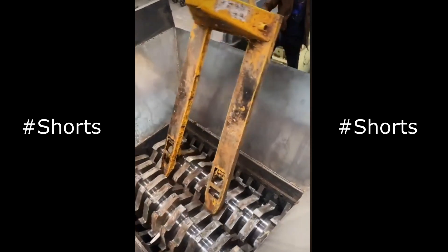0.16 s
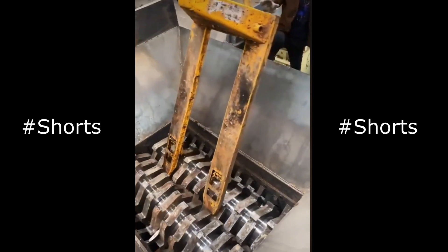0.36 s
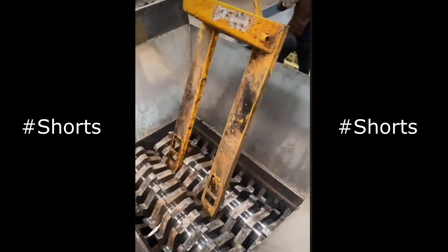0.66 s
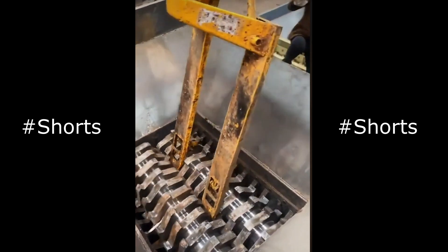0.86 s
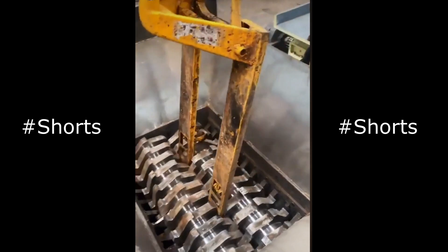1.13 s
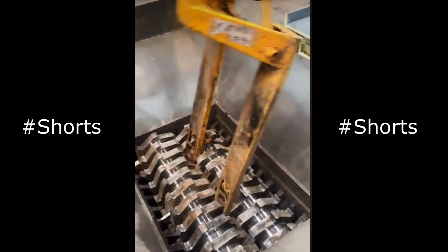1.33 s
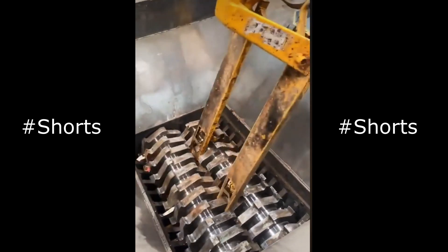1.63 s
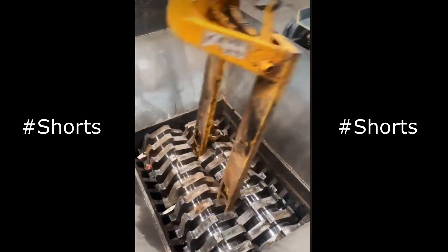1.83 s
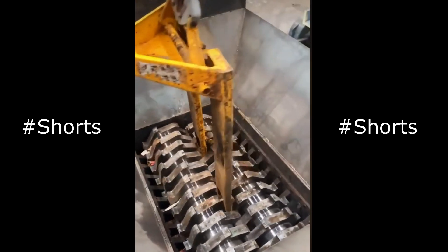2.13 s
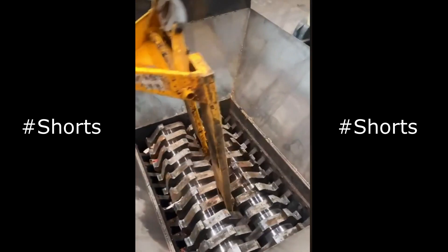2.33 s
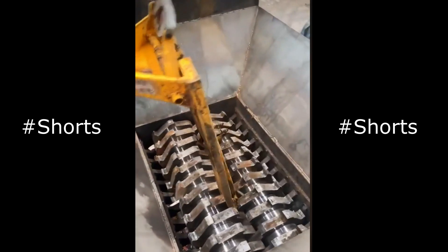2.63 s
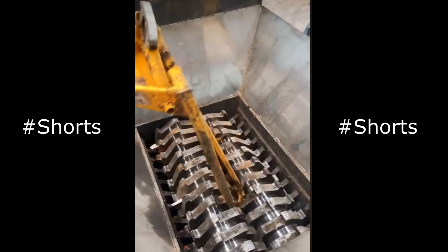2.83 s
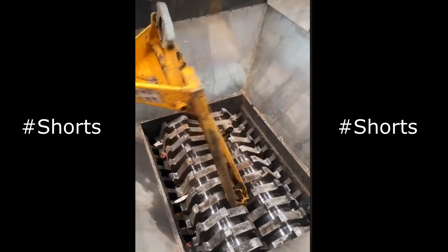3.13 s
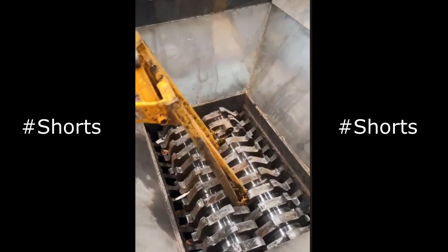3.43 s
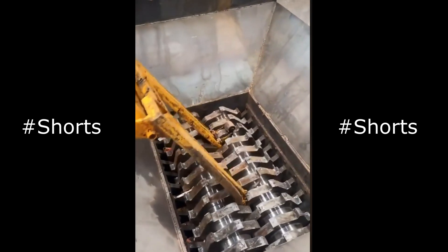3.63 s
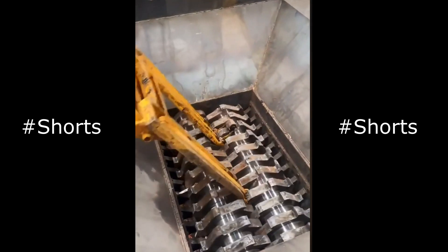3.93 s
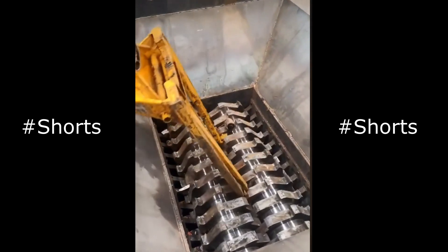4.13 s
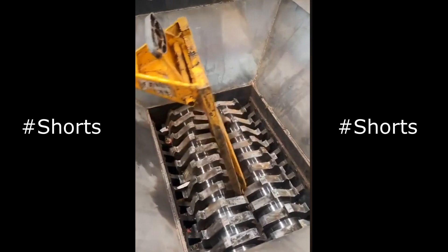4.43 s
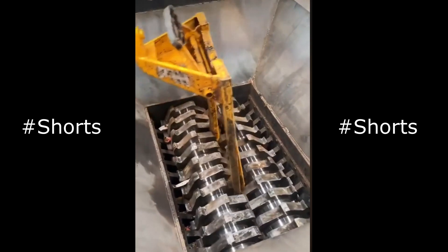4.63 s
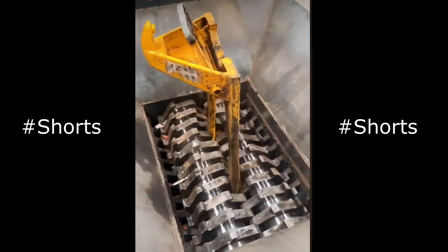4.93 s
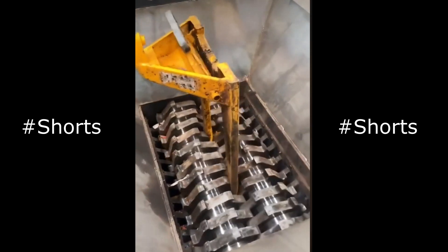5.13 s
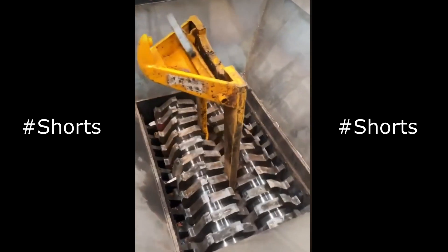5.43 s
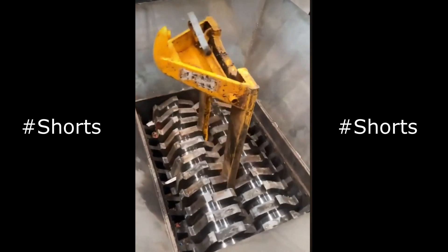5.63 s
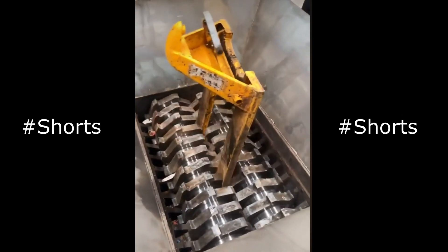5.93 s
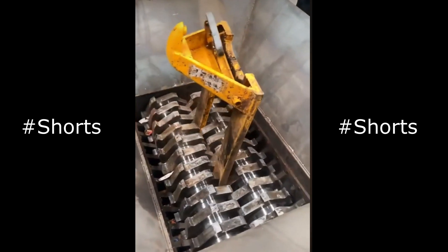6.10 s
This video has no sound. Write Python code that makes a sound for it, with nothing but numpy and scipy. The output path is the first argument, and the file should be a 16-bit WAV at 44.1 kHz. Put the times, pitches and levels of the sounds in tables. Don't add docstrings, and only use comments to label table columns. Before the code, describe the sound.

Close above a steel hopper, a twin-shaft shredder chews the forks of a pallet jack. Dense crunching and scraping over a low drive rumble dips abruptly, then hard clanks and snaps come in uneven bursts between quieter stretches. After another brief dip, a heavy bite roars low, cracks sharply and breaks into a shrill multi-toned squeal, followed by weaker grinding and ticks. Phone microphone, stereo, slightly saturated.

```python
import sys
import numpy as np
from scipy import signal
from scipy.fft import rfft, irfft, next_fast_len
from scipy.io import wavfile
from scipy.ndimage import uniform_filter1d

SR = 44100
rng = np.random.default_rng(int(sys.argv[2]) if len(sys.argv) > 2 else 0)


def how_loud(loudness_db):
    steps = np.asarray(loudness_db, float) / 20
    return 10 ** steps


def wav_record(signal):
    frames = np.transpose(np.atleast_2d(signal))
    bounded = np.clip(frames, -1, 1)
    quanta = np.round(bounded * 32767).astype(np.int16)
    wavfile.write(sys.argv[1], SR, quanta)


N = 276242
TIME = np.arange(N) / SR


def level(x, db):
    return x * how_loud(db) / np.sqrt(np.mean(x ** 2))


def colour(x, points):
    hz, db = np.transpose(points)
    size = next_fast_len(len(x))
    f = np.maximum(np.fft.rfftfreq(size, 1 / SR), 1)
    gain = how_loud(np.interp(np.log(f), np.log(hz), db))
    return irfft(rfft(x, size) * gain, size)[:len(x)]


def walk(rate, size=N):
    k = int(SR / rate)
    held = np.repeat(rng.standard_normal(size // k + 1), k)
    return 1.03 * uniform_filter1d(uniform_filter1d(held, k), k)[:size]


def mode(x, hz, t60):
    pole = np.exp(2j * np.pi * hz / SR - np.log(1000) / (t60 * SR))
    return signal.lfilter([1], [1, -pole], x).imag


def strokes(t, s, hold, db, rise, fall):
    power = 0
    for start, held, peak_db, fade in np.broadcast(s, hold, db, fall):
        swelling_db = abs(rise) * np.maximum(start - t, 0)
        fading_db = abs(fade) * np.maximum(t - start - held, 0)
        power = power + how_loud(2 * (peak_db - swelling_db - fading_db))
    return np.sqrt(power)


def grains(per_s, spread_db, smear_s):
    size = (rng.random(N) < per_s / SR) * how_loud(spread_db * rng.exponential(size=N))
    puffs = signal.lfilter([1], [1, -np.exp(-1 / (smear_s * SR))], size)
    return (puffs + 3.6 * np.mean(puffs)) * rng.standard_normal(N)


def steel(x, lo_hz, hi_hz, t60, share, count):
    t, rings = TIME[:SR // 8], 0
    for _ in range(2):
        hz = lo_hz * (hi_hz / lo_hz) ** rng.random(count)
        phase = 2 * np.pi * rng.random(count)
        partials = np.sin(2 * np.pi * hz[:, None] * t + phase[:, None])
        ring = np.sum(partials, axis=0) * 1000 ** (-t / t60)
        rings = rings + signal.oaconvolve(x * np.maximum(walk(7), 0), ring)[:N]
    return level(x, 0) + share * level(rings, 0)


# (time [s], hold [s], level [dB])
BITES = [(0, 0.18, -28.5), (0.154, 0.24, -24.5), (0.396, 0.4, -28.5), (0.878, 0.085, -24), (0.97, 0.1, -36),
         (1.093, 0.1, -35.5), (1.207, 0.085, -28.5), (1.287, 0.095, -33), (1.471, 0.06, -27),
         (1.52, 0.028, -39), (1.605, 0.11, -23.5), (1.765, 0.095, -27), (1.989, 0.04, -47.5),
         (2.203, 0.046, -67), (2.591, 0.033, -22.5), (2.72, 0.033, -24.5), (2.754, 0.28, -35.5),
         (3.619, 0.02, -27.5), (3.712, 0.076, -45.5), (3.997, 0.18, -40.5), (4.2, 0.25, -52),
         (4.459, 0.19, -34.5), (4.614, 0.28, -56), (4.986, 0.035, -37.5), (5.114, 0.24, -17),
         (5.424, 0.11, -43), (5.54, 0.14, -46), (5.654, 0.24, -37.5), (5.89, 0.076, -38.5),
         (5.97, 0.24, -37), (6.115, 0.16, -38), (6.112, 0.071, -41)]
# (time [s], hold [s], grinding level [dB], hiss above the grinding [dB])
SLIDE = [(0, 0.074, -27.5, -11), (0.137, 0.2, -32, -15), (0.287, 0.36, -41, -14), (0.494, 0.078, -35, -3),
         (0.662, 0.035, -37.5, -1), (0.868, 0.18, -32.5, -8), (0.897, 0.066, -24, -1.5),
         (1.104, 0.018, -39, 8), (1.489, 0.067, -44, -0.5), (1.618, 0.089, -43, 2.5),
         (1.784, 0.054, -36.5, 0.5), (1.913, 0.27, -61, -2.5), (2.403, 0.13, -60, -4.5),
         (4.287, 0.18, -66, 0.5), (4.652, 0.21, -62, -11), (2.214, 0.033, -44.5, -5.5),
         (2.283, 0.081, -53.5, -7), (2.566, 0.054, -37.5, -5.5), (2.74, 0.0076, -25, -20.5),
         (2.759, 0.25, -35, -29), (3.497, .11, -55.5, -3), (3.61, 0.072, -46, -1), (3.71, 0.3, -55, -3),
         (4.057, 0.14, -55, -5.5), (4.234, 0.055, -58, 1), (4.465, 0.056, -37.5, -22),
         (4.524, 0.11, -46, -9), (4.924, 0.13, -50.5, -0.5), (5.123, 0.3, -32.5, -19.5),
         (5.411, 0.12, -20, -2.5), (5.52, 0.24, -36, 7), (5.735, 0.077, -13.5, 1),
         (5.902, 0.19, -48.5, -2.5), (6.15, 0.045, -45.5, -11), (6.228, 0.013, -31, -39)]
# (frequency [Hz], level [dB])
CRUSH = [(110, -38), (200, 0.5), (400, -1.5), (600, -4), (800, -12), (1500, -21), (2600, -39), (6000, -96)]
GRIND = [(500, -25), (900, -5), (1400, 0), (2600, -7), (4000, -11), (5500, -15), (7000, -32), (9000, -70)]
HISS = [(3500, -36), (5500, -4), (7500, 2), (10000, -3.5), (13000, 2.5), (15800, -9), (16000, -70)]


def teeth():
    crushing = steel(grains(460, 0.88, 0.0026), 121.0, 936, 0.07, 0.15, count=10)
    tearing = grains(1500, 2.8, .002)
    crush = colour(crushing, CRUSH)
    grind = colour(steel(tearing, 700, 6000, .08, .25, count=30), GRIND) * how_loud(1.2 * walk(18))
    hiss = colour(steel(tearing, 5000, 15500, .15, 1.1, count=40), HISS) * how_loud(1.2 * walk(18))

    slow = TIME[::64]
    s, hold, grind_db, hiss_db = np.transpose(SLIDE)
    rise, fall = 430, 334
    crush_move = strokes(slow, *np.transpose(BITES), 1500, 495)
    grind_move = strokes(slow, s, hold, grind_db, rise, fall)
    hiss_move = strokes(slow, s, hold, grind_db + hiss_db, rise, fall)

    squeal_dip_db = np.interp(TIME, (5.39, 5.43, 5.86, 5.92), (0, -12, -12, 0))
    first_change_s, idle_wander_db = 1.42, 2.5
    out = 0
    for x, move, early_idle_db, late_idle_db, thinning in (
            (crush, crush_move, -31, -54, 0),
            (grind, grind_move, -43, -70, 1),
            (hiss, hiss_move, -57, -89, 1.4)):
        idle = how_loud(np.where(TIME < first_change_s, early_idle_db, late_idle_db + idle_wander_db * walk(4)))
        gain = np.hypot(np.interp(TIME, slow, move), idle)
        out = out + level(x, 0) * gain * how_loud(thinning * squeal_dip_db)
    return out


# (frequency [Hz], level [dB])
BODY = [(120, -31), (250, -11), (600, -0.5), (1500, -8), (2800, -7), (4000, -11.5), (6000, -38.5)]


def strike(table, thud_db, contact_s):
    out, t = np.zeros(N + SR), TIME[:SR // 7] - .008
    after = np.maximum(t, 0) / max(contact_s, .001)
    bite = after ** 2 * np.exp(2 - 2 * after)
    rattle = 0.13 * (1 - np.exp(-after)) * np.exp(-t / 0.02)
    push = bite + rattle
    for s, db, hz, treble_db in table:
        noise, pick = rng.standard_normal((2, len(t))), rng.random((3, 12))
        force = push * noise[0] * (1.2 + np.abs(noise[1]) ** 3.13)
        main = mode(force, hz, 0.028)
        ring = sum(mode(force, 600 * 8.0 ** p, 0.04) for p in np.r_[pick[0], pick[2, 4:]])
        crack = colour(force, GRIND)
        body = colour(force, BODY)
        tinkle = sum(mode(force, 5500 + 9500 * p, .035) for p in pick[1])
        treble = colour(force, HISS) + .02 * tinkle
        thud = sum(mode(force, 130 * 3.7 ** p, 0.053) for p in pick[2, :4])
        parts = ((main, -10), (ring, -11), (crack, -6), (body, -5),
                 (treble, treble_db + 6.5), (thud, thud_db))
        i = int((s - .01) * SR)
        out[i:i + len(t)] += sum(x / np.max(np.abs(x)) * how_loud(db + d) for x, d in parts)
    return out[:N]


# (time [s], peak level [dB], main mode [Hz], treble level [dB])
BLOWS = [(0.855, -23.5, 1375, -10), (1.462, -32, 875, -28.5), (1.512, -15, 1740, -5.5),
         (1.592, -17.5, 850, -19), (1.634, -12, 3640, -11), (1.704, -24, 605, -10),
         (1.773, -11.5, 1930, -19), (1.842, -17.5, 500, -24), (2.212, -42.5, 1900, -8),
         (2.279, -33.5, 1140, -31), (2.588, -9, 1860, -9.5), (2.716, -12, 2000, -17),
         (2.991, -14, 1920, -14.5), (4.988, -19, 1980, -37.5), (5.974, -29.5, 1250, -26)]


def frame_blows():
    return strike(BLOWS, thud_db=-9.5, contact_s=0.004)


# (time [s], peak level [dB], main mode [Hz], treble level [dB])
CRACKS = [(0.038, -16.5, 850, -10), (0.195, -13.5, 1230, -15), (0.277, -7.5, 810, -12.5),
          (1.611, -16, 650, -10.5), (2.549, -31, 1590, -11), (2.945, -8, 1510, -29), (2.987, -7, 2700, -16),
          (3.615, -14, 1530, -18.5), (4.455, -16, 1790, -18), (4.587, -21, 1560, -14.5),
          (5.367, -5.5, 3320, -51), (6.172, -22, 2900, -36.5), (6.204, -32.5, 1150, -52.5)]


def tooth_cracks():
    return strike(CRACKS, thud_db=-18, contact_s=0.0035)


# (time [s], peak level [dB], main mode [Hz], treble level [dB])
SNAPS = [(.149, -11, 3430, -10.5), (.153, -13.5, 1475, -9.5), (.194, -3.5, 1540, -17),
         (.274, -11, 2900, -18.5), (.28, -6, 1286, -26), (.489, -23.5, 1140, -10.5),
         (.855, -19, 1400, -7.5), (.902, -20.5, 2010, -10.5), (.936, -10, 990, -18),
         (1.087, -18.5, 2830, -4.5), (1.121, -24, 3950, -8.5), (1.514, -3.5, 1800, -18),
         (1.516, -13, 2700, -18.5), (1.607, -9.5, 660, -18.5), (1.675, -17.5, 494, -19.5),
         (2.59, -0.5, 2800, -22.5), (2.714, -8, 3520, -11.5), (2.944, -1.5, 710, -30.5),
         (2.947, -8, 810, -31.5), (3.614, -5.5, 1675, -31.5), (4.034, -33.5, 950, -27),
         (4.099, -34, 1114, -22.5), (4.464, -14.5, 2095, -21), (4.532, -28, 1880, -23),
         (4.591, -20, 1990, -19), (5.11, -22, 405, -39.5)]


def edge_snaps():
    return strike(SNAPS, thud_db=-32.5, contact_s=.0014)


def rub(rubbed_things):
    out = np.zeros(N)
    for peaks, rows in rubbed_things:
        s, hold, db, fade = np.transpose(rows)
        part = slice(int((s[0] - .05) * SR), int((s[-1] + .5) * SR))
        t = TIME[part]
        pressure = strokes(t, s, hold, db, 1400, fade)
        for hz, width, peak_db in peaks:
            rough, t60 = min(width / 80, 1), 2.2 / width
            wavering_hz = hz + 0.23 * width * walk(33, size=len(t))
            tone = np.sin(2 * np.pi * np.cumsum(wavering_hz) / SR + hz)
            noise = mode(rng.standard_normal(len(t)), hz, t60)
            noise = noise * np.sqrt(2 * np.log(1000) / (t60 * SR))
            grip = pressure * how_loud(peak_db + 2.2 * walk(14, size=len(t)))
            out[part] += np.sqrt(2) * grip * (np.sqrt(1 - rough ** 2) * tone + rough * noise)
    return out


# (frequency [Hz], width [Hz], level [dB])
BEAM_ROOT = [(1136, 12, 0)]
WEB = [(1594, 12, 0)]
RIB = [(1782, 14, 0)]
LIP = [(2538, 22, 0)]
HEEL = [(3400, 30, 0)]
SEAM = [(2050, 320, 0)]
# (time [s], hold [s], pressure [dB], fade [dB/s])
SINGING = [
    (BEAM_ROOT, [(5.405, .03, -22.5, 250), (5.495, 0.028, -26.5, 150), (5.57, 0.11, -37.5, 149), (5.67, .03, -29.5, 150), (5.7, .1, -27.5, 400), (5.97, 0.012, -43, 400), (6.19, 0.026, -37.5, 300), (6.215, .05, -36.5, 300)]),
    (WEB, [(5.4, .02, -36, 200), (5.425, .055, -32.5, 150), (5.515, 0.14, -37, 100), (5.7, 0.116, -40, 200), (6.2, .06, -39.5, 300)]),
    (RIB, [(5.39, 0.066, -36, 300), (5.51, .04, -29, 400), (5.635, 0.062, -31.5, 300), (5.795, 0.045, -32, 350), (6.19, 0.082, -44, 300)]),
    (LIP, [(5.39, 0.03, -26.5, 250), (5.5, .2, -45, 200), (5.73, .03, -34.5, 200), (5.765, .035, -33, 700), (6.2, 0.051, -39.5, 300)]),
    (HEEL, [(5.39, 0.031, -24.5, 600), (5.465, 0.061, -28.5, 498), (5.6, .05, -46, 200), (5.705, .02, -40, 200), (5.73, 0.067, -26, 700), (6.21, 0.037, -40, 300)]),
    (SEAM, [(5.42, 0.05, -33.5, 200), (5.56, .1, -60, 200), (5.725, 0.12, -33.5, 700), (6.174, .004, -30, 900), (6.21, 0.033, -40, 400)]),
]


def squealing_beam():
    return rub(SINGING)


# (frequency [Hz], width [Hz], level [dB])
TAB = [(2233, 16, 1), (4410, 67, 13.5), (5700, 27, -21.5), (6700, 27, -19.5)]
WHEEL = [(7050, 40, 3), (3530, 29, -9), (5860, 130, -5)]
DISC = [(9474, 12, 0), (10852, 20, -4), (10100, 150, -2), (13600, 26, -7), (14600, 70, -16),
        (15700, 24, -9), (8718, 20, -8)]
CAP = [(9680, 110, 2), (8400, 160, -17.5), (7150, 48, -20.5), (6200, 150, -9.5)]
LEVER = [(3252, 52, 8), (6280, 83, -9), (7300, 50, -10)]
BOLT = [(2900, 16, 2), (6140, 20, -8), (3370, 27, -10), (3800, 19, -9.5)]
EDGE = [(3447, 49, -3), (6546, 120, -9)]
BEAM_LOW = [(1840, 30, -17), (2330, 24, -24), (2692, 30, -19), (2860, 24, -23), (3860, 30, -12),
            (4119, 22, -26), (4355, 22, -16)]
BEAM_HIGH = [(5125, 22, 14), (5230, 40, 8), (5402, 30, 12), (5870, 30, -4), (6352, 22, -7), (6455, 22, -4),
             (6562, 22, -4), (6701, 30, -1), (7137, 22, 0), (7798, 45, -3), (8718, 22, -2), (9174, 22, -9),
             (9360, 22, -8), (9475, 22, -5), (10118, 22, -11)]
FLANGE = [(10974, 22, -7), (11447, 22, -12), (12706, 30, -2), (12984, 30, -9), (13442, 22, -11),
          (13900, 60, -16), (14048, 30, -11), (14279, 30, -10), (14715, 22, -11), (14790, 30, -14),
          (15405, 30, -11), (15650, 40, -20)]
# (time [s], hold [s], pressure [dB], fade [dB/s])
CUTTERS = [
    (TAB, [(2.605, 0.0022, -31, 210)]),
    (WHEEL, [(2.725, 0.027, -32.5, 307), (2.8, 0.13, -52.5, 296), (2.92, 0.08, -45.5, 500)]),
    (DISC, [(2.735, 0.03, -40, 138), (2.8, .22, -53, 304)]),
    (CAP, [(2.99, 0.0087, -31.5, 603)]),
    (LEVER, [(1.53, 0.014, -42, 400), (1.64, 0.028, -49.5, 400), (1.78, 0.0046, -44.5, 500), (1.815, 0.014, -42.5, 500)]),
    (BOLT, [(3.025, 0.052, -60, 119.5)]),
    (DISC + [(3170, 19, 5.1)], [(4.475, 0.049, -49.5, 240)]),
    (EDGE, [(5.368, 0.0043, -9.5, 901)]),
    (BEAM_LOW, [(5.39, 0.05, -21, 168), (5.5, 0.01, -24, 98), (5.56, .12, -31, 100), (5.69, 0.13, -26, 552), (5.97, 0.0057, -49, 253), (6.185, 0.056, -40, 300), (6.235, .03, -29, 304)]),
    (BEAM_HIGH + FLANGE, [(5.395, 0.43, -41, 191), (5.505, 0.027, -38.5, 198), (6.215, 0.05, -56.5, 300)]),
]


def cutters_and_beam():
    return rub(CUTTERS)


# (frequency [Hz], width [Hz], level [dB])
CHIP = [(6400, 28, 5.2)]
TOOTH = [(2900, 120, 5), (2620, 200, 2), (3780, 120, 4), (4030, 140, 4.5), (15650, 130, -34.5)]
SPARK = [(15200, 900, 2), (13800, 500, -3)]
PIN = [(8230, 25, 0)]
BAR = [(1823, 22, -2), (3203, 45, -13), (2700, 60, -12), (4160, 40, -17), (6363, 60, -14), (5750, 60, -20),
       (7434, 50, -23), (11520, 20, -28)]
KNEE = [(287, 24, 0.006)]
# (time [s], hold [s], pressure [dB], fade [dB/s])
RUBBED = [
    (CHIP, [(.538, 0.008, -37.5, 502)]),
    (TOOTH, [(1.09, 0.045, -30.5, 800)]),
    (SPARK, [(1.52, .02, -50.5, 501.5), (1.61, .04, -54.5, 302), (1.695, 0.043, -42.5, 301.5), (1.775, 0.063, -48, 300)]),
    (PIN, [(1.105, .01, -43.5, 140)]),
    (BAR, [(1.519, 0.017, -19.5, 900), (1.612, 0.005, -26, 168), (1.779, 0.0052, -33, 169), (1.88, 0.15, -58, 400)]),
    (KNEE, [(2.594, 0.0049, -25, 600), (2.72, 0.027, -22.5, 500)]),
]


def small_parts():
    return rub(RUBBED)


# (time [s], rumble level [dB], floor slab above the rumble [dB])
LOAD = [(0, -34.5, -2.5), (.15, -26.5, 0.5), (.4, -27, -2), (.9, -25.5, -15), (1.3, -27.5, -26.5),
        (1.41, -31, -27), (1.46, -37.5, -6), (2.1, -43.5, 5), (2.4, -39, -0.5), (3.1, -48.5, 8.5),
        (3.73, -35.5, -3.5), (3.95, -43, -6.5), (5.095, -43, 1.5), (5.108, -21.5, -4), (5.36, -19.5, -26.5),
        (5.41, -47, -14), (5.8, -40.5, -12), (6.26, -37.5, -19)]
# (frequency [Hz], level [dB])
RUMBLE = [(41, -19.5), (70, -7), (108, -1), (151, 0.5), (210, -4.5), (260, -17), (340, -32), (570, -120)]
SLAB_COLOUR = [(20, -54), (33, -30), (48, -12), (70, -15.5), (90, -11.5), (150, -71.5)]


def drive():
    slab = colour(rng.standard_normal(N), SLAB_COLOUR) * how_loud(1.4 * walk(6.5))
    rumble = colour(rng.standard_normal(N), RUMBLE) * how_loud(2.8 * walk(25) + 1.2 * walk(5.21))
    s, *columns = np.transpose(LOAD)
    load_db, slab_db = [np.interp(TIME, s, c) for c in columns]
    return level(slab, 0) * how_loud(load_db + slab_db) + level(rumble, 0) * how_loud(load_db)


# (time of silence [s], fade out [s], fade in [s])
SPLICES = [
    (1.427, 0.069, 0.028),
    (5.086, 0.022, 0.029),
]


def change_scenes(dry):
    for s, fade_out, fade_in in SPLICES:
        fade = np.maximum((s - TIME) / fade_out, (TIME - s) / fade_in)
        dry = dry * np.clip(fade, .004, 1) ** 2
    return dry


# (frequency [Hz], level [dB])
MIC = [(30, -5), (60, -1.5), (3600, -0.5), (4700, 3), (5800, 0.5), (11000, -0.5), (12500, -4.5),
       (14000, -5)]
# (frequency [Hz], lead of the left [half turns per side], sway of that lead [same])
PORTS = [(30, 0, .03), (125, .015, .065), (250, .03, .07), (700, .12, .28), (1150, .04, .1),
         (3600, .24, .22), (4200, .48, .035), (5350, .525, .035), (5900, .95, .1), (7600, 1.0, .12),
         (9500, 1.08, .24), (11300, 1.24, .14), (11900, 1.47, .045), (12900, 1.54, .045),
         (13500, 1.97, .09), (16000, 2.01, .05)]


def two_ports(dry):
    f, _, cells = signal.stft(colour(dry, MIC), SR, nperseg=2 ** 9)
    hz, turns, sway = np.transpose(PORTS)
    turns, sway = (np.interp(np.log(f + 1), np.log(hz), c)[:, None] for c in (turns, sway))
    waver = uniform_filter1d(rng.standard_normal(cells.shape), size=4, axis=0)
    waver = uniform_filter1d(waver, size=9, axis=1)
    lead = np.exp(1j * np.pi * (turns + sway * waver / np.std(waver)))
    return signal.istft(cells * np.array([lead, 1 / lead]), SR)[1][:, :N]


def scene():
    dry = teeth() + frame_blows() + tooth_cracks() + edge_snaps()
    dry = dry + squealing_beam() + cutters_and_beam() + small_parts() + drive()
    return two_ports(change_scenes(dry))


def thin(x):
    drop_db, drop_spread_db, drop_from_hz = -9, 8, 900
    attack_keeps_db = 4
    overlap = 3 * 2 ** 9
    f, _, cells = signal.stft([x[0] + x[1], x[0] - x[1]], SR, nperseg=2 ** 11, noverlap=overlap)
    band = np.unique(np.floor(24 * np.log2(1 + f / 700)), return_inverse=True)[1]
    starts = np.flatnonzero(np.diff(band, prepend=-1))
    power = np.add.reduceat(np.abs(cells) ** 2, starts, axis=1) / np.bincount(band)[:, None]
    power = uniform_filter1d(power, size=3, axis=2) + 1e-18
    around = uniform_filter1d(np.sqrt(power.sum(axis=0)), size=9, axis=0) ** 2
    treble = around[len(around) // 2:].sum(axis=0)
    attack = treble > how_loud(2 * attack_keeps_db) * np.roll(treble, shift=3)
    luck = uniform_filter1d(rng.standard_normal(power.shape), size=13, axis=2)
    limit_db = drop_db + drop_spread_db * luck / np.std(luck)
    keep = (power > around * how_loud(2 * limit_db)) | attack
    keep = keep[:, band] | (f < drop_from_hz)[:, None]
    mid, side = signal.istft(cells * keep, SR, noverlap=overlap)[1][:, :N]
    return np.array([mid + side, mid - side]) / 2


def top_cut(x):
    return signal.sosfilt(signal.butter(12, 15900, fs=SR, output="sos"), x)


def record(dry):
    mix = thin(0.88 * np.tanh(dry / 0.91))
    top = signal.ellip(8, .2, 70, 15850, fs=SR, output="sos")
    mix = signal.sosfilt(top, mix)
    return top_cut(mix)


dry = scene()
out = record(dry)
wav_record(out)
```